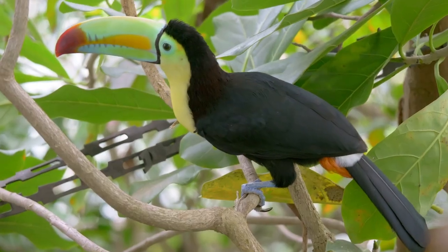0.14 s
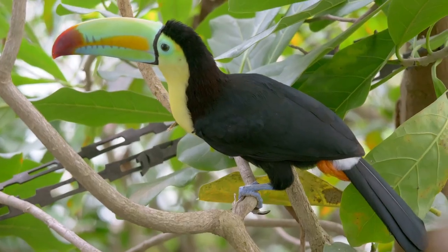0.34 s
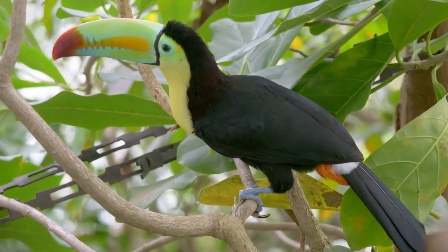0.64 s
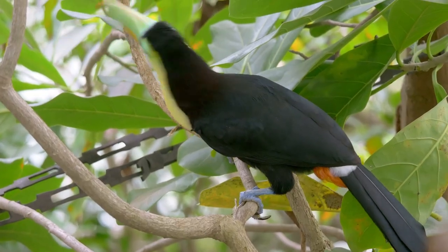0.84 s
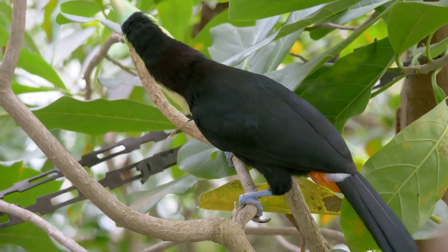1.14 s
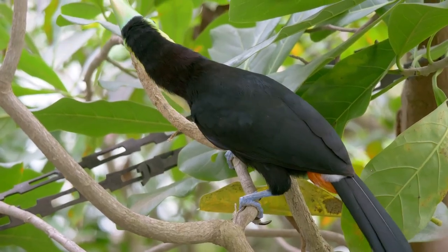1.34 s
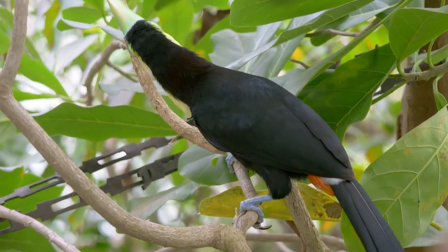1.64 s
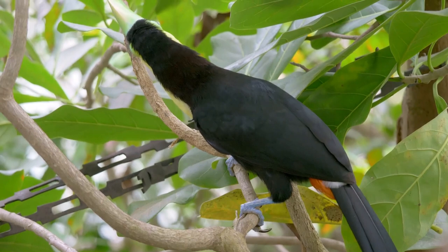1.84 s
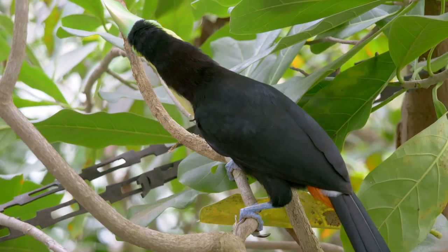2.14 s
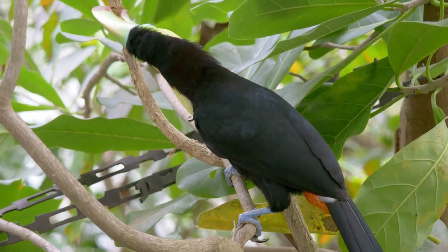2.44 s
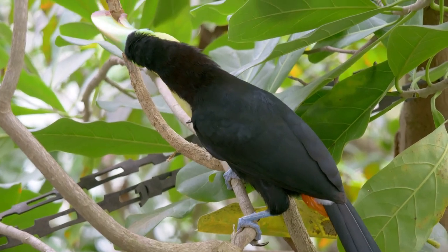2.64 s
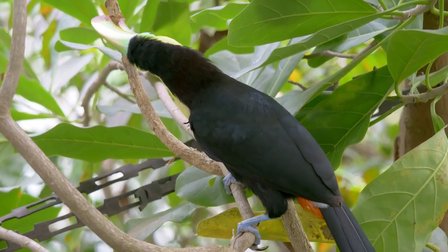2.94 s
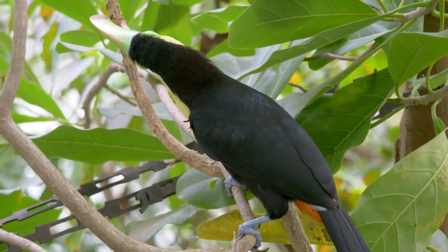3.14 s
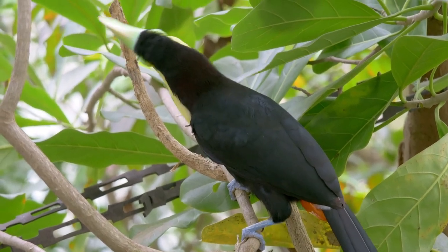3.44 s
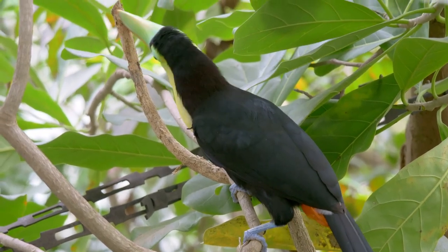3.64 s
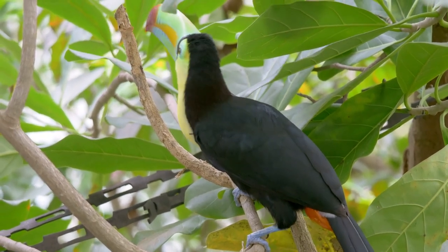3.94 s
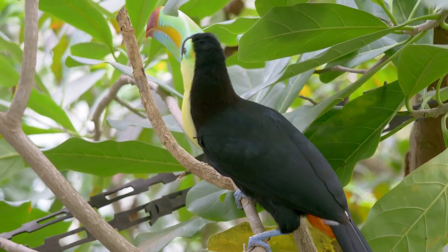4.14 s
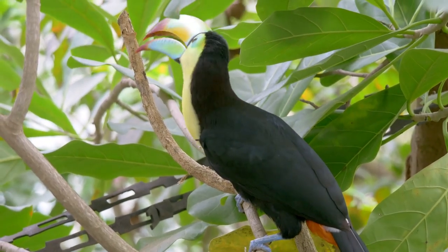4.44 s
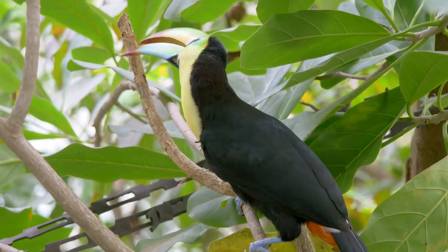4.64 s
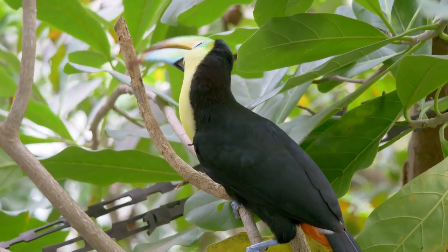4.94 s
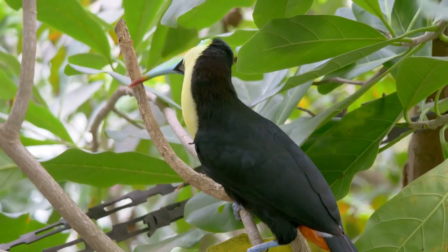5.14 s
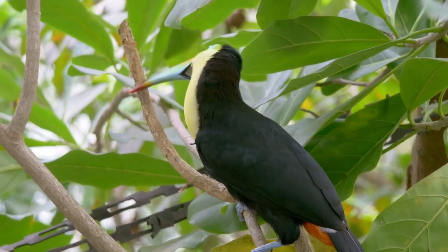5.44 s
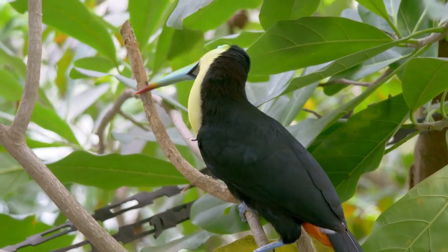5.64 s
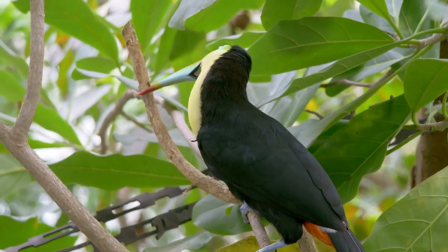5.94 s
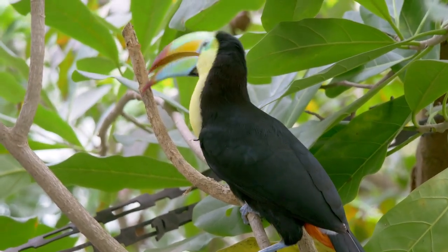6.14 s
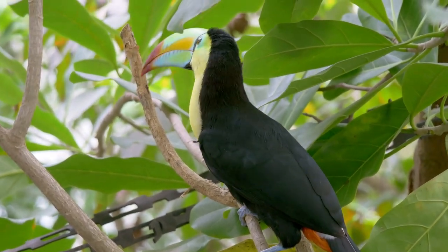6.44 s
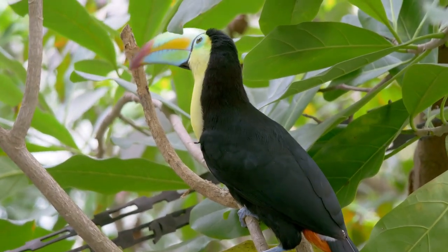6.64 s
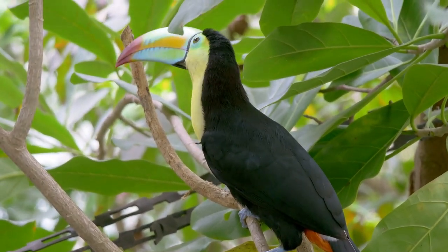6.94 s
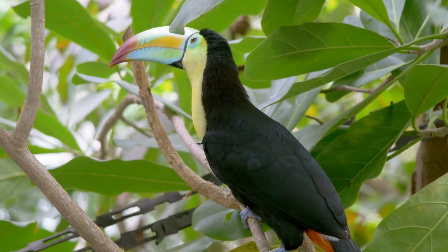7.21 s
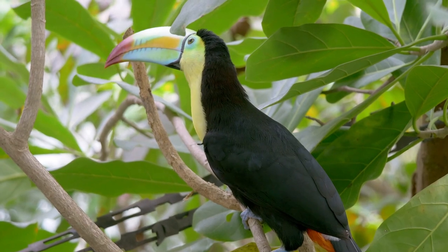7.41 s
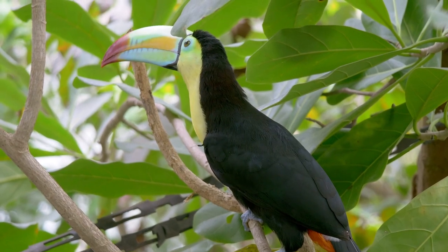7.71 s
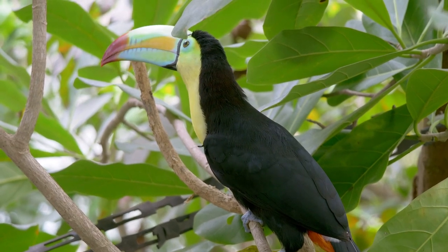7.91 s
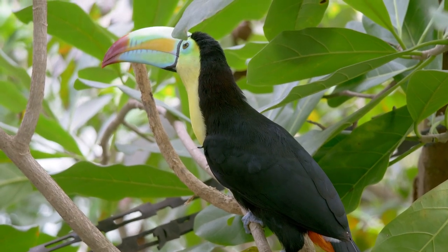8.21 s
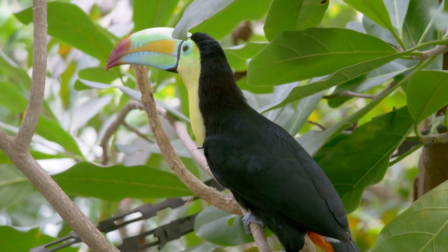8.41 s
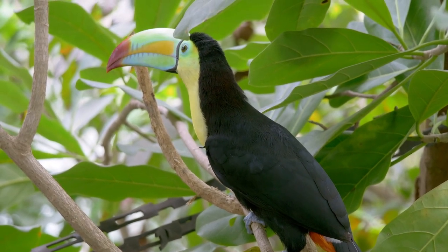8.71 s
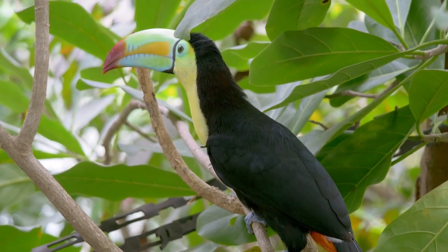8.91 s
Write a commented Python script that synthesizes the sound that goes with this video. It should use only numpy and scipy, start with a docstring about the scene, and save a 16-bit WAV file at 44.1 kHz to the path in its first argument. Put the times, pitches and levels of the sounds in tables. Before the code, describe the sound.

Sharp paired toucan yelps ring out nearby, spaced by seconds, while smaller birds chirp and whistle farther off amid swelling insect haze.

```python
"""Toucan yelping in a leafy aviary

Close to the microphone a toucan gives four pairs of shrill yelps: wavering harmonic stacks, three led by a creak.
Farther off, small birds chirp, chip and whistle as gliding tones; rasps are narrow noise, a rattle is pulsed noise.
An insect drone and the far wash, both shaped noise, swell over the first seconds, with pulsed high trills.
Low noise in soft gusts is air on the microphone; scattered reflections give leaf returns and a faint echo.
"""
import sys
import numpy as np
from scipy import signal
from scipy.fft import rfft, irfft
from scipy.io import wavfile
from scipy.ndimage import uniform_filter1d

SR = 44100
rng = np.random.default_rng(int(sys.argv[2]) if len(sys.argv) > 2 else 0)


def file_out(sig):
    """Save sig as 16-bit WAV at sys.argv[1]."""
    # one column per channel
    cols = np.atleast_2d(sig).T
    # limit, then scale
    lim = np.clip(cols, -1, 1)
    pcm = np.round(lim * 32767).astype(np.int16)
    wavfile.write(sys.argv[1], SR, pcm)


N = 399987
TIME = np.arange(N) / SR
BINS = np.fft.rfftfreq(1024, 1 / SR)
CATCH_S = .014  # width of the rough catch that opens a yelp


def amp(db):
    """Decibels to gain."""
    return 10 ** (np.asarray(db) / 20)


def unit(x):
    """Scales to rms 1."""
    return x / np.sqrt(np.mean(x ** 2) + 1e-20)


def spectrum(points, hz):
    """Reads (Hz, value) points on a log frequency axis."""
    f, value = np.transpose(points)
    return np.interp(np.log(hz + 1), np.log(f + 1), value)


def swell(points):
    """Gain over time from (s, dB) points."""
    return amp(np.interp(TIME, *np.transpose(points)))


def wander(size, hz):
    """Smooth chance from one second of low-passed noise at rms 1, cut or repeated to size."""
    f = np.fft.rfftfreq(SR, 1 / SR)
    smooth = irfft(rfft(rng.standard_normal(SR)) * np.exp(-(f / hz) ** 2), SR)
    return np.resize(unit(smooth), size)


def fades(t, rise, fall):
    """Soft start and end of a note, in the units of t."""
    nearest_end = np.minimum((t - t[0]) / rise, (t[-1] - t) / fall)
    return np.sin(np.pi / 2 * np.clip(nearest_end, 0, 1)) ** 2


def add(mix, start_s, sound, pan_db=0):
    """Places a sound in the stereo mix; pan_db is left over right, and overhanging ends are cut."""
    at = round(start_s * SR)
    sound = sound[..., max(-at, 0):]
    part = mix[:, max(at, 0):][:, :sound.shape[-1]]
    part += amp([[pan_db / 2], [-pan_db / 2]]) * sound[..., :part.shape[1]]


def phase_of(hz):
    """Running phase of a pitch curve."""
    return 2 * np.pi * np.cumsum(hz) / SR


def diffuse(colour, patchy_db, pan_db):
    """Stereo noise from all around: partly shared between the channels, with drifting patches of level."""
    # how alike left and right are; columns: frequency_hz, coherence
    likeness = [(70, 0.44), (200, 0.61), (550, -0.18), (1600, -0.24), (2700, -0.08)]
    a, b, c, d, patches = rng.standard_normal((5, N // 256 + 5, len(BINS)))
    patches = uniform_filter1d(patches, size=14, axis=0)
    patches = unit(uniform_filter1d(patches, size=8, axis=1))
    same = np.clip(spectrum(likeness, BINS), -1, 1)
    left = a + 1j * b
    right = same * left + np.sqrt(1 - same ** 2) * (c + 1j * d)
    frames = np.array([left, right]) * colour * amp(patchy_db * patches)
    noise = signal.istft(frames, nperseg=1024, noverlap=768, time_axis=1, freq_axis=2)[1][:, :N]
    return unit(noise) * amp([[pan_db / 2], [-pan_db / 2]])


def scatter(x, t60s, delay):
    """Dense reflections of random sign after a delay in s, each band dying at its own speed."""
    signs = rng.choice([-1., 1.], (2, SR))
    taps = signs * (rng.random((2, SR)) < 1 / 16) * (TIME[:SR] > delay)
    hz, t, z = signal.stft(taps, SR, nperseg=256)
    decay = amp(-60 * t / spectrum(t60s, hz)[:, None])
    tail = signal.istft(z * decay, SR, nperseg=256)[1]
    tail = tail / np.linalg.norm(tail, axis=1)[:, None]
    return signal.fftconvolve(x.mean(0)[None], tail, axes=1)[:, :N]


def microphone_air():
    """Air rumbling on the microphone: low noise, a steady draught with soft gusts over it."""
    # colour of the rumble; columns: frequency_hz, relative_db
    rumble = [(12, -20), (28, -6.5), (45, 13), (68, -0.5), (95, -18.5), (135, -16.5), (250, -38.5),
              (600, -60.5)]
    # gusts; columns: peak_s, half_length_s, rise_above_draught_db
    gusts = [(1.9, 0.61, 8), (2.704, 0.17, 12.5), (3.85, 0.52, 11), (4.804, .25, 5), (5.96, .2, 9),
             (7.997, 0.1, 9)]
    draught_db = -57
    air = diffuse(amp(spectrum(rumble, BINS)), patchy_db=0.9, pan_db=-5.5)
    gusts_db = sum(db * np.exp(-((TIME - s) / length) ** 2) for s, length, db in gusts)
    return amp(draught_db + gusts_db) * air


def far_wash():
    """The far wash of the place: broad shaped noise, still at rms 1."""
    # columns: frequency_hz, relative_db
    colour = [(100, -9.5), (200, -4), (320, -11), (520, -7.5), (820, -1), (1200, 0), (2000, -1.5),
              (2900, -4), (4200, 1.5), (5200, -1.5), (7300, -7.5), (8400, -13), (9200, -28.5), (13500, -27),
              (15200, -51.5)]
    return diffuse(amp(spectrum(colour, BINS)), patchy_db=2.76, pan_db=0.0)


def insect_drone():
    """Many insects blurred into narrow bands of noise, near rms 1 before the swell."""
    # columns: centre_hz, width_hz, relative_db
    bands = [(7010, 183, -3.5), (6010, 530, -9.5), (5480, 140, -8.5)]
    colour = sum(amp(db) * np.exp(-((BINS - hz) / width) ** 2 / 2) for hz, width, db in bands)
    return diffuse(colour, patchy_db=2.25, pan_db=1.3)


def ambience():
    """Drone and wash, swelling together."""
    # level of each of the two; columns: time_s, level_db
    level = [(0, -57.5), (.6, -53), (1.4, -50), (2.2, -44), (3.3, -44.5), (4.2, -41), (5.5, -40),
             (7.5, -41), (9.07, -40.5)]
    return swell(level) * (insect_drone() + far_wash())


def trills(scoop_hz=230, settle_s=0.081, blur_hz=28, depth=0.84):
    """An insect's wing strokes pulse a high tone that slides up to pitch."""
    # trills, all of one length; columns: start_s, level_db
    trill_list = [(.22, -60), (1.723, -53.5), (3.723, -47.5), (5.16, -44.5), (6.576, -45), (8.067, -44.5)]
    pitch_hz, strokes_per_s, length_s = 6237, 54.4, 0.793
    out = np.zeros((2, N))
    for start, db in trill_list:
        t = np.arange(0, length_s, 1 / SR)
        hz = pitch_hz - scoop_hz * np.exp(-t / settle_s) + blur_hz * wander(len(t), hz=200)
        strokes = 1 + depth * np.cos(2 * np.pi * strokes_per_s * t)
        tone = unit(strokes * np.sin(phase_of(hz)))
        add(out, start, amp(db) * tone * fades(t, rise=0.095, fall=0.014), pan_db=4.0)
    return out


def rattle(start=6.468, end=6.78, per_s=24.95, db=-42, hollow_hz=1170, upper_hz=3250):
    """A short dry rattle far off: each pulse stirs a hollow resonance and a higher one."""
    out = np.zeros((2, N))
    t = np.arange(0, end - start, 1 / SR)
    uneven_time = t + .004 * wander(len(t), hz=40)
    pulses = np.exp(-(uneven_time % (1 / per_s)) / .02)
    body = np.cos(2 * np.pi * hollow_hz * t) + amp(-5) * np.cos(2 * np.pi * upper_hz * t)
    add(out, start, amp(db) * pulses * unit(body * wander(len(t), hz=300)), pan_db=5)
    return out


def rasps(flutter_db=2.5):
    """Short noises too rough to hold a pitch: narrow bands that swell, flutter and die."""
    # hoarse distant calls, lisps and rustles, level at the top of the arch;
    # columns: start_s, end_s, centre_hz, width_hz, level_db, left_right_db
    rasp_list = [(0.606, 1.36, 3590, 280, -54.5, 4), (2.89, 3.03, 3400, 334, -44, 4),
                 (4.13, 4.34, 9500, 900, -56.5, 0), (4.085, 4.26, 11500, 2200, -65, 0),
                 (4.401, 5.18, 8080, 385, -50.5, 3), (4.858, 4.971, 2050, 610, -36.5, 2),
                 (4.86, 4.969, 1100, 383, -35.5, 1), (6.159, 6.39, 4450, 800, -41, 0),
                 (6.134, 6.37, 8800, 2800, -55.5, -4), (8.244, 8.36, 862, 140, -50.5, 11),
                 (8.476, 8.63, 858, 150, -49, 10), (8.58, 8.723, 3320, 250, -43.5, -5),
                 (8.781, 8.993, 794, 169, -46, 7.5)]
    out = np.zeros((2, N))
    for start, end, hz, width, db, pan_db in rasp_list:
        t = np.arange(start, end, 1 / SR)
        carrier = np.exp(2j * np.pi * hz * t)
        band = np.zeros((2, len(t)))
        for channel in range(2):
            slow_noise = wander(len(t), width) + 1j * wander(len(t), width)
            band[channel] = (slow_noise * carrier).real
        arch = np.sin(np.pi * np.linspace(0, 1, len(t)))
        add(out, start, amp(db + flutter_db * wander(len(t), hz=70)) * band * arch, pan_db)
    return out


def whistles(waver=0.0074):
    """Slurred pure notes of birds farther off, each bending through three pitches."""
    # level before the distance mix;
    # columns: start_s, end_s, first_hz, middle_hz, last_hz, level_db, left_right_db
    whistle_list = [(1.953, 2.403, 2483, 2427, 2284, -53.5, 22),
                    (2.127, 2.277, 3560, 4055, 4250, -38.5, 13), (2.599, 2.64, 670, 812, 915, -42.5, 9),
                    (2.75, 2.885, 2710, 2647, 2496, -43, 13.5), (2.764, 2.797, 578, 815, 900, -36, 9),
                    (2.82, 2.907, 750, 871, 442, -44, 14), (2.95, 3.008, 1040, 934, 930, -38, 9),
                    (2.986, 3.097, 944, 642, 487, -43.5, 9), (2.998, 3.353, 2574, 2400, 2130, -52, 12),
                    (3.776, 4.061, 2616, 2495, 2330, -48, 11), (3.896, 4.104, 3400, 3835, 4150, -50.5, -12),
                    (4.07, 4.224, 4550, 3800, 3280, -44, 0), (4.088, 4.177, 9100, 8100, 7250, -44, 0),
                    (6.149, 7.193, 1934, 1868, 1796, -56.5, 9), (6.229, 6.303, 2640, 2430, 2430, -48.5, -7),
                    (7.7, 8.216, 442.6, 458.7, 482, -57, -13)]
    out = np.zeros((2, N))
    for start, end, *pitches, db, pan_db in whistle_list:
        u = np.linspace(0, 1, round((end - start) * SR))
        bend_hz = np.polyval(np.polyfit([0, .5, 1], pitches, 2), u)
        hz = bend_hz * (1 + waver * wander(len(u), hz=70.0))
        note = np.sqrt(2) * amp(db) * np.sin(phase_of(hz))
        add(out, start, note * fades(u, rise=.2, fall=.3), pan_db)
    return out


def series(run, loudness, shape, second_db, third_db, pan_db, waver):
    """One falling note repeated at a changing pace, never quite alike; overtones show only where it is loudest."""
    out = np.zeros((2, N))
    start, count, first_gap, last_gap, bend = run
    loudest, top_db, away_db = loudness
    gaps = first_gap + (last_gap - first_gap) * np.linspace(0, 1, count - 1) ** bend
    t = np.arange(0, shape[-1][0], 1 / SR)
    arch = np.sin(np.pi * t / t[-1])
    for s in start + np.append(0, np.cumsum(gaps)):
        # each note has its own pitch and speed of fall
        hz = rng.uniform(.96, 1.04) * np.interp(t * rng.uniform(.8, 1.2), *np.transpose(shape))
        phase = phase_of(hz * (1 + waver * wander(len(t), hz=200)))
        overtones = amp(second_db) * np.sin(2 * phase) + amp(third_db) * np.sin(3 * phase)
        note = arch * np.sin(phase) + arch ** 4 * overtones
        level_db = top_db - away_db * (s - loudest) ** 2
        add(out, s, np.sqrt(2) * amp(level_db) * note, pan_db)
    return out


def chirps():
    """A small bird's run of falling chirps, quickening as it goes."""
    # columns: start_s, notes, first_gap_s, last_gap_s, bend of the change in pace
    run = (1.357, 16, .172, .103, .68)
    # before the distance mix; columns: loudest_s, level_there_db, loss_one_second_away_db
    loudness = (2.75, -40.5, 5.5)
    # pitch before each note's variation; columns: time_from_note_start_s, pitch_hz
    shape = [(0, 1507), (0.022, 1363), (0.028, 1060), (.048, 874)]
    return series(run, loudness, shape, second_db=-16, third_db=-28, pan_db=-5, waver=.022)


def chips():
    """Another small bird's run of sharp falling chips, slowing as it goes."""
    # columns: start_s, notes, first_gap_s, last_gap_s, bend of the change in pace
    run = (4.458, 11, .135, .175, 3.5)
    # before the distance mix; columns: loudest_s, level_there_db, loss_one_second_away_db
    loudness = (5.05, -32.5, 9.6)
    # pitch before each note's variation; columns: time_from_note_start_s, pitch_hz
    shape = [(0, 3704), (0.022, 3516), (.03, 2988), (.042, 2670)]
    return series(run, loudness, shape, second_db=-7, third_db=-27, pan_db=8, waver=.03)


def creak(start, end, hz, db, jitter=0.016, growth_db=7):
    """Slow uneven pulses through the toucan's throat, growing into the yelp."""
    # colour of the throat; columns: frequency_hz, relative_db
    colour = [(600, -36.5), (1200, -12), (1800, -2), (2400, -13), (3000, -3), (3600, 6), (4200, -10),
              (5400, -23), (7000, -44.5)]
    t = np.arange(start, end, 1 / SR)
    phase = phase_of(hz * (1 + jitter * wander(len(t), hz=249)))
    voice = sum(amp(spectrum(colour, k * hz)) * np.cos(k * phase) for k in range(1, 12))
    growing = voice * amp(np.linspace(0, growth_db, len(t)))
    return start, amp(db) * unit(growing) * fades(t, rise=.007, fall=.008)


def yelp(t, hz, effort_db, release, harmonics_db, catch_db, flutter_db, half_db=-35, rasp_db=-35, catch_hz=3300,
         jitter=0.003, fray=3, fray_s=0.018, drift_db=1.03):
    """A harmonic stack, slightly strong-weak from cycle to cycle; opens with a rough catch and frays as it falls."""
    # upper partials; columns: harmonic, level_against_third_db
    overtones = [(4, -28), (5, -27.5), (6, -51)]
    # change of the first three harmonics one throat width above the throat's pitch, in dB
    sharp_loss_db = [-12, 0.1, -15.5]
    throat_hz, throat_width_hz = 1615, 184  # the voice is fullest at this pitch
    attack_s = 0.0076
    age, left = t - t[0] - CATCH_S, t[-1] - t

    # pitch and level give way as the air runs out; the pitch sags over a share of the release
    hz = hz - 205 * np.exp(-left / (.48 * release))
    effort_db = effort_db - 13 * np.clip(1 - left / release, 0, 1) ** 1.97
    sharp = (np.maximum(hz - throat_hz, 0) / throat_width_hz) ** 2
    levels = []
    for db, loss_db in zip(harmonics_db, sharp_loss_db):
        levels.append(db + effort_db + loss_db * sharp + drift_db * wander(len(t), hz=30))

    unsteady = 1 + fray * np.exp(-left / fray_s)
    phase = phase_of(hz * (1 + jitter * unsteady * wander(len(t), hz=170)))
    partials = list(enumerate(levels, 1)) + [(round(k), levels[2] + db) for k, db in overtones]
    tones = []
    for k, db in partials:
        gain = amp(db + flutter_db * unsteady * wander(len(t), hz=123))
        # each harmonic starts at its own phase, so the wave is not spiky
        tones.append(gain * np.sin(k * phase + np.pi * k * k / 2))
    strong_weak = 1 + amp(half_db) * np.cos(phase / 2)
    voice = tones[0] + sum(tones[1:]) * strong_weak
    voice = np.sqrt(2) * voice * (1 + amp(rasp_db) * wander(len(t), hz=800))

    catch = wander(len(t), hz=1500) * np.cos(2 * np.pi * catch_hz * t) * np.exp(-(age / CATCH_S) ** 2)
    onset = np.clip(age / attack_s + .5, 0, 1)
    return t[0], (onset * voice + amp(catch_db) * catch) * fades(t, rise=.003, fall=.009)


def lead(start, end, release, hz, slide_hz, *harmonics_db):
    """Starts high and thin, and fills out as the pitch slides down to the throat's resonance."""
    # the voice falters once and recovers; columns: time_s, half_length_s, pitch_drop_hz, level_drop_db
    at, length, drop_hz, drop_db = (4.796, .03, 138, 12.5)
    slide_s, tired_db = .041, -6  # time to settle; weaker voice after the falter
    t = np.arange(start - CATCH_S, end, 1 / SR)
    slide = np.exp(-(np.maximum(t - start, 0) / slide_s) ** 2)
    falter = np.exp(-((t - at) / length) ** 2)
    tired = np.maximum.accumulate(falter) - falter
    effort_db = tired_db * tired - drop_db * falter
    bent_hz = hz + slide_hz * slide - drop_hz * falter
    return yelp(t, bent_hz, effort_db, release, harmonics_db, catch_db=-52.5, flutter_db=1.33)


def reply(start, end, release, crest, hz, lift_hz, swell_db, *harmonics_db):
    """Opens with a rough catch; a second push of air makes the note louder and arches its pitch."""
    settle_hz, settle_s = 42.7, .025  # it starts slightly sharp
    crest_s, swell_ahead_s, swell_s = .035, .025, .011  # crest width; the swell comes just before it
    base_db, spent_db_per_s = -0.5, -33.5  # the push fades again after the crest
    t = np.arange(start - CATCH_S, end, 1 / SR)
    settling = settle_hz * np.exp(-np.maximum(t - start, 0) / settle_s)
    lift = lift_hz * np.exp(-((t - crest) / crest_s) ** 2)
    held_back = .5 - .5 * np.tanh((t - crest + swell_ahead_s) / swell_s)
    effort_db = base_db - swell_db * held_back + spent_db_per_s * np.maximum(t - crest, 0)
    return yelp(t, hz + settling + lift, effort_db, release, harmonics_db, catch_db=-39, flutter_db=.6)


def toucan():
    """The near bird: leading yelps and their replies, with creaks where the voice is about to catch."""
    # leading yelps, harmonic levels before effort; the first is already sounding at time zero;
    # columns: start_s, end_s, release_s, pitch_hz, slide_hz, first_db, second_db, third_db, left_right_db
    leads = [(-.09, 0.079, 0.035, 1605, 180.7, -20, -21.5, -31, -2.5),
             (2.077, 2.24, .042, 1602, 178, -18, -19.5, -32.5, -2),
             (4.621, 4.873, 0.019, 1592, 143.4, -19.5, -17.5, -28, -6),
             (7.319, 7.466, 0.039, 1614, 159, -18, -18, -25, -4)]
    # answering yelps, harmonic levels before effort; columns: start_s, end_s, release_s, crest_s,
    # pitch_hz, lift_hz, swell_db, first_db, second_db, third_db, left_right_db
    replies = [(.499, .655, .029, .587, 1606, 65, 10, -18, -15.5, -19, -3),
               (2.55, 2.677, .028, 2.602, 1585, 48, 4.5, -22.3, -19.7, -27, -2),
               (5.322, 5.465, .024, 5.41, 1564, 42, 3.5, -24.3, -17.3, -26, -5),
               (7.866, 8.034, .022, 7.964, 1580, 84, 4.5, -21.2, -10.7, -15.4, -2)]
    # creaks at about a third of the yelp's opening pitch; columns: start_s, end_s, pulse_rate_hz, level_db
    creaks = [(2.028, 2.083, 602, -29), (4.567, 4.628, 590, -30.5), (7.267, 7.329, 596.5, -29.5)]
    out = np.zeros((2, N))
    for call, rows in ((lead, leads), (reply, replies)):
        for *row, pan_db in rows:
            add(out, *call(*row), pan_db)
    for row in creaks:
        add(out, *creak(*row), pan_db=-4.5)
    return out * fades(TIME, rise=.004, fall=.004)


def scene():
    """The toucan is close, with quick returns from the leaves; the small birds are wetter."""
    # decay of the enclosure; columns: frequency_hz, t60_s
    echo = [(1600, 0.67), (3300, 0.52), (8000, 0.36)]
    near = toucan()
    leaves = amp(-15) * scatter(near, [(1500, .16), (5000, .24)], delay=.009)
    aviary = amp(-25) * scatter(near, echo, delay=0.033)
    birds = whistles() + chirps() + chips()
    far = amp(-4.0) * birds + amp(-3.0) * scatter(birds, [(500, 0.63), (4000, 0.49)], delay=0.0017)
    return microphone_air() + ambience() + trills() + rattle() + rasps() + far + aviary + leaves + near


def record(dry):
    """The recorder's band limit: a steep low-pass."""
    edge_hz = 15150
    lowpass = signal.firwin(511, edge_hz, window=("kaiser", 9), fs=SR)
    return signal.oaconvolve(dry, lowpass[None], "same")


dry = scene()
out = record(dry)
file_out(out)
```